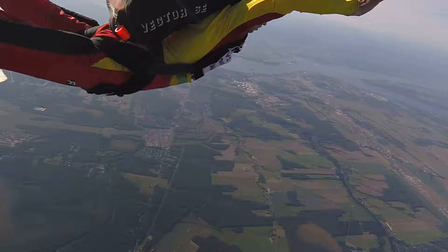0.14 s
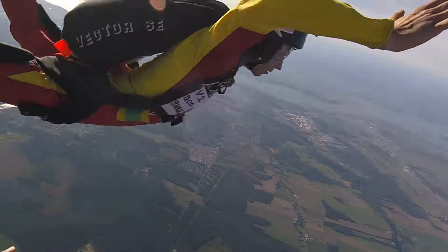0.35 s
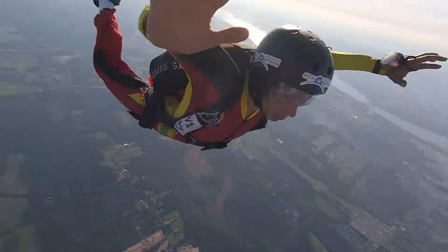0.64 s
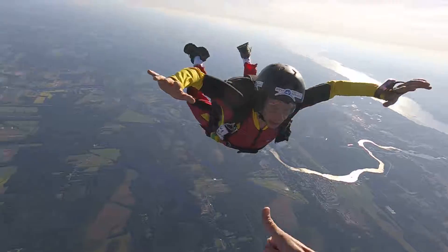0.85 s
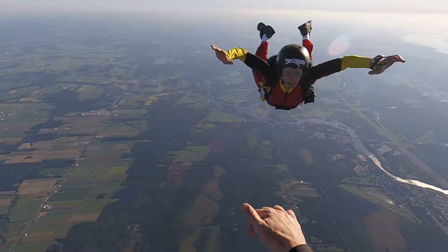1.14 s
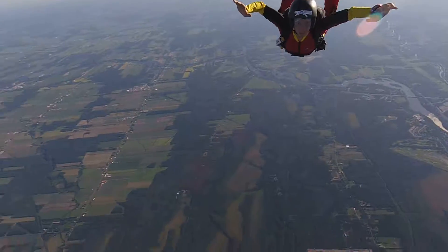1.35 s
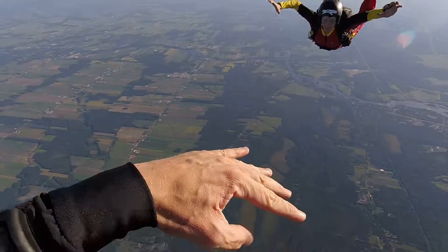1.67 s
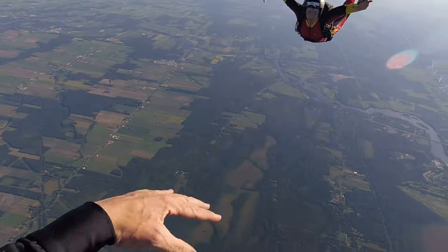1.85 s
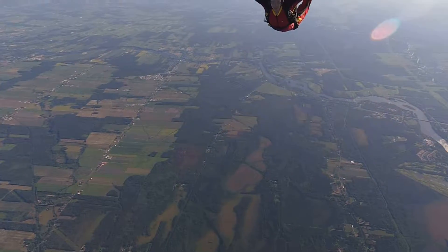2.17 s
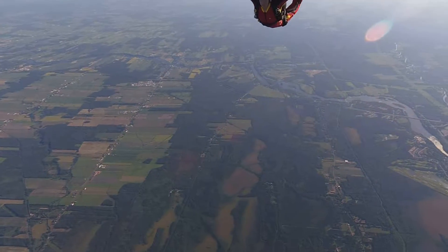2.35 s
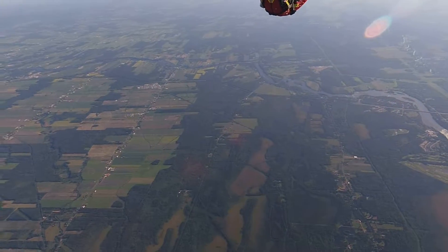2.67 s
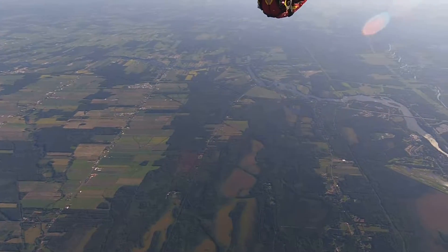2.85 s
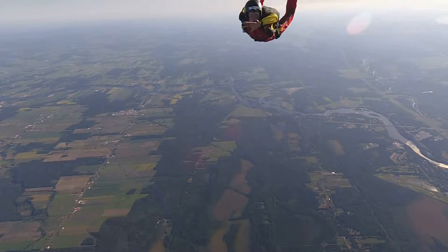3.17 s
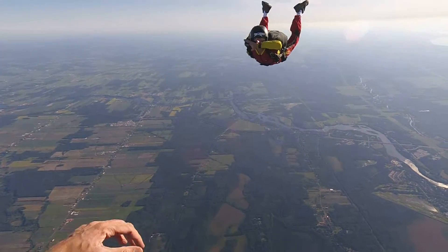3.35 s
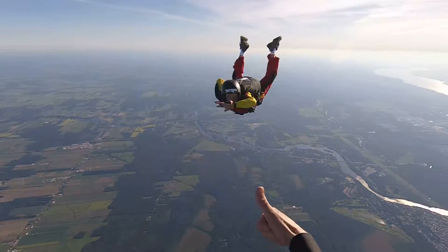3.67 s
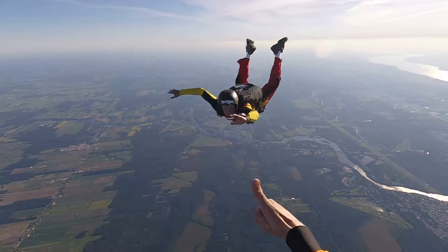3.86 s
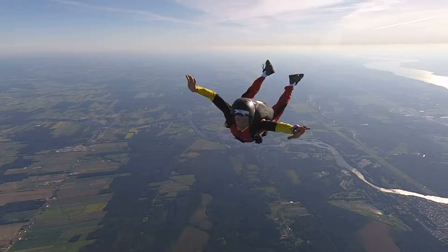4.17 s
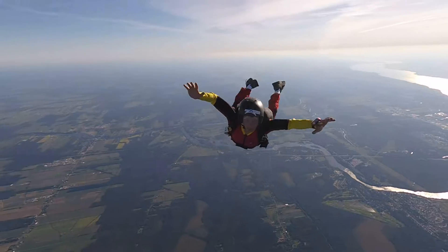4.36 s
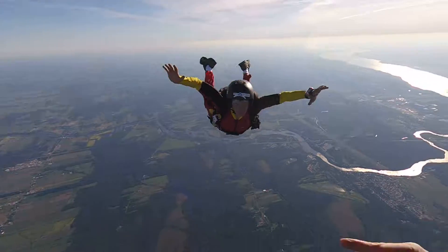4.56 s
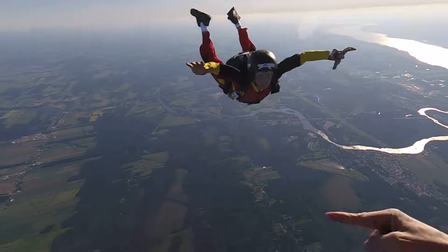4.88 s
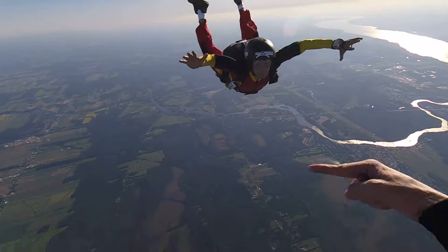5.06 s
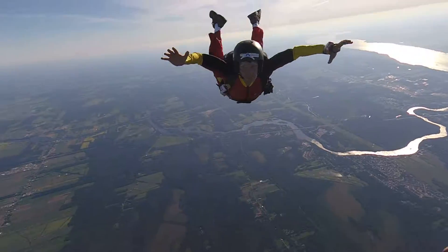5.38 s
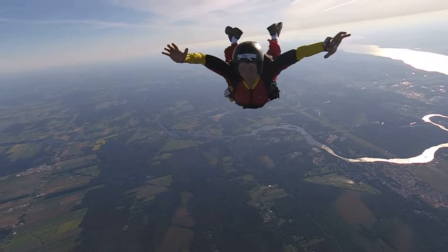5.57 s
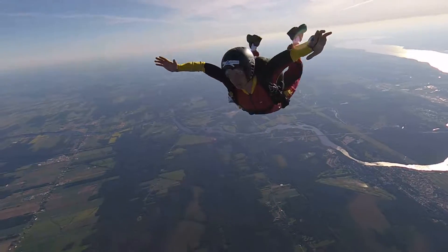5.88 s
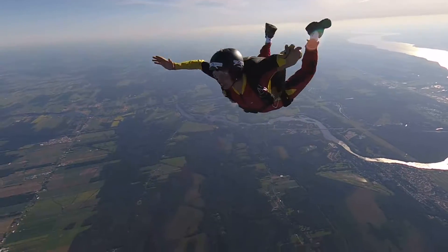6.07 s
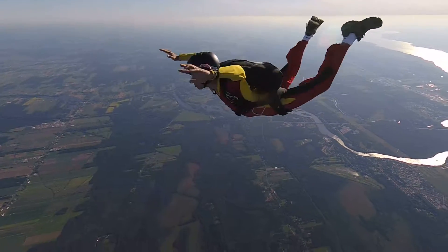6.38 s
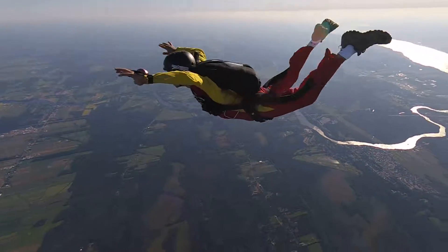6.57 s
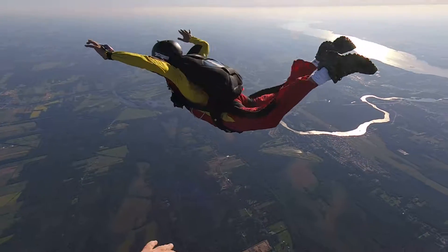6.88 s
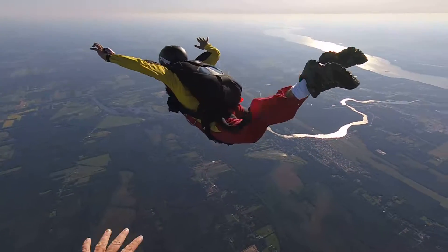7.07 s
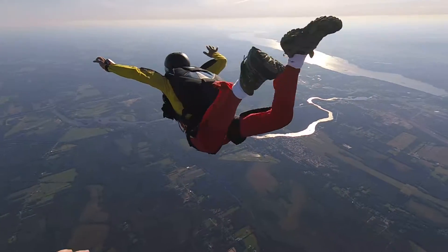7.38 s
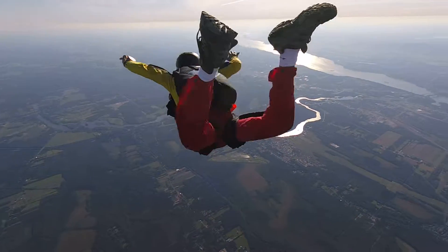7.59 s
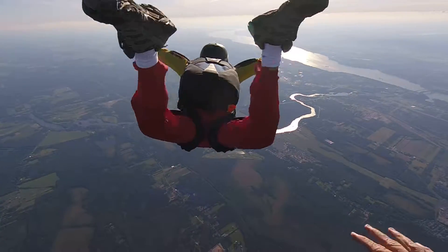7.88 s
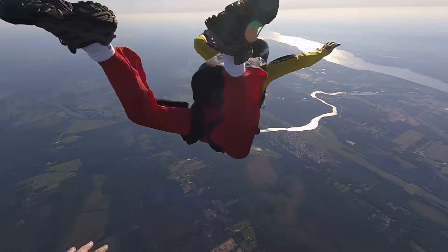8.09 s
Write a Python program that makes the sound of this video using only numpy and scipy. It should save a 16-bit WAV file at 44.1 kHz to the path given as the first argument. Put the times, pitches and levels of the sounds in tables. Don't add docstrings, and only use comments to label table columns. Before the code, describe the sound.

Relentless wind noise in open air, captured in mono by a tiny camera on a falling person's helmet. Low throbbing pressure dominates from start to end, its peaks blunted. Over it come irregular flaps, rough bursts and dry ticks, strongest shortly after two seconds and busy again near five and six, with smoother, duller lulls around three and seven. A thin airy hiss rises and falls above.

```python
import sys
import numpy as np
from scipy import signal
from scipy.fft import rfft, irfft, next_fast_len
from scipy.io import wavfile
from scipy.ndimage import uniform_filter1d, map_coordinates

SR = 44100
rng = np.random.default_rng(int(sys.argv[2]) if len(sys.argv) > 2 else 0)


def put_to_file(sound):
    columns = np.atleast_2d(sound).T
    safe = np.clip(columns, -1, 1)
    whole_steps = np.round(safe * 32767)
    wavfile.write(sys.argv[1], SR, whole_steps.astype(np.int16))


def level_to_linear(level):
    exponent = np.asarray(level, float) / 20
    return 10 ** exponent


N = 362943

# t/s, throb level/dB, heave over throb/dB
VORTICES = [(0, -11, -8), (.85, -13.5, -3), (1.35, -10.5, -10.5), (1.6, -16, -7), (2.05, -10.5, -10),
            (2.65, -11.5, -8.5), (3.4, -13, -4), (3.74, -12, -11), (4.0, -13, -1.5), (4.45, -15, -5.5),
            (4.86, -9.5, -7), (5.25, -16, 3), (5.5, -16, -5), (5.7, -15, 0), (6.33, -10, -13),
            (7.06, -12.5, -8), (7.4, -16, 0), (8.23, -15, -2)]
# f/Hz, density/dB per Hz
RUMBLE = [(40, -13.5), (55, -0.5), (75, 0.5), (115, -2), (140, -5), (190, -20.5), (250, -25)]
# f/Hz, density/dB per Hz
HEAVE = [(6, -15), (14, -6), (25, -9), (45, -1), (60, -9), (80, -37)]
SHEDDING_HZ, HZ_PER_WAKE_DB, HZ_PER_HEAVE_DB = 89.93, 1.34, -0.9


def vortices():
    throb_db, heave_db = curves(VORTICES)
    wake_db = sum(turbulence()) + gusts(ROLLS)
    rate_hz = SHEDDING_HZ + HZ_PER_WAKE_DB * (wake_db - wake_db.mean())
    rate_hz = rate_hz + HZ_PER_HEAVE_DB * (heave_db - heave_db.mean())
    pumping = rush(RUMBLE, patchy_db=0.5) + level_to_linear(-4.5) * shedding(rate_hz, spread_hz=52)
    throb = steadied(pumping, share=0.25)
    heave = level_to_linear(heave_db) * steadied(rush(HEAVE, patchy_db=0.0), share=0.34)
    return level_to_linear(throb_db + 0.18) * (throb + heave)


def shedding(hz, spread_hz):
    turn = 2 * np.pi * np.cumsum(hz) / SR
    return unit(wobble(spread_hz) * np.cos(turn) + wobble(spread_hz) * np.sin(turn))


def steadied(x, share):
    swell = np.sqrt(np.abs(uniform_filter1d(x ** 2, size=1100)) + 0.01)
    return unit(x / swell ** share)


def wind():
    calm_db, size_db = turbulence()
    gust_db = gusts(GUSTS)
    ragged = ragged_gate(size_db)
    low, high = burst_power()
    eddy_db = calm_db + gust_db - 1.5
    churn = level_to_linear(eddy_db + 2.0 + 0.87 * ragged) ** 2
    return (wake(calm_db + size_db, gust_db, ragged, low)
            + eddies(eddy_db, churn, low)
            + port_hiss(gust_db, ragged, churn, high))


def ragged_gate(size_db):
    flutter = np.maximum(wobble(190), 0) ** 2
    lumps = 0.57 * wobble(7.4) + 1.03 * wobble(45) + 3.27 * wobble(100) + 5.7 * flutter
    ragged = 11 * np.tanh(lumps / 11)
    smoothing_per_db = 0.03
    return ragged * np.clip(1 - smoothing_per_db * (size_db - size_db.mean()), 0.3, 1.4)


# f/Hz, density/dB per Hz
WAKE = [(110, -16.5), (160, 4), (220, 1), (330, -7), (500, -16), (1000, -31.5)]


def wake(flow_db, gust_db, ragged, low):
    gust_share = 0.36
    wake_db = flow_db + gust_share * gust_db + gusts(ROLLS) - 4.5 + 0.77 * wobble(11)
    power = level_to_linear(wake_db + 0.5 + 0.65 * ragged) ** 2 + level_to_linear(7.0) * low
    return np.sqrt(power) * rush(WAKE, patchy_db=-1.06)


# f/Hz, density/dB per Hz
EDDY = [(150, -29.5), (300, 1), (600, -5.5), (1200, -13), (2400, -24.5), (3600, -32.5), (4600, -40),
        (5600, -62)]


def eddies(eddy_db, churn, low):
    power = churn + level_to_linear(eddy_db - 12.5) ** 2 + low
    return np.sqrt(power) * rush(EDDY, patchy_db=-0.2)


# t/s, peak level/dB, sizzle/dB, length/ms
BURSTS = [(0.455, -10.5, -29, 3.5), (0.624, -15, -24, 6.4), (1.033, -11.5, -25, 5.5),
          (1.37, -13, -24.5, 5.8), (1.413, -12, -22, 7.2), (2.078, -13, -29.5, 4.2), (2.106, -9.5, -21, 12),
          (2.208, -7.5, -18.5, 5.4), (2.406, -11, -29.5, 5.7), (2.602, -9, -20, 4.2),
          (3.645, -12.5, -28.5, 7), (4.028, -16, -28, 6), (4.191, -10.5, -18, 6.6), (4.329, -17, -29, 5.1),
          (4.668, -6.5, -22.5, 6), (4.788, -10.5, -34, 3.4), (4.841, -12.5, -31, 8.6), (4.914, -15, -22, 3),
          (5.062, -17.5, -29.5, 5.5), (5.49, -23, -31, 4.7), (5.556, -16, -34, 4.6),
          (5.696, -19, -17.5, 6.8), (5.768, -13, -27.5, 6.2), (5.812, -5.5, -24.5, 5.9),
          (5.863, -7, -28, 6.7), (5.978, -6.5, -32, 5.4), (6.282, -10.5, -21.5, 7),
          (6.402, -12.5, -16.5, 3.6), (7.391, -22, -23, 5), (7.465, -16, -17.5, 7.5)]
# t/s, peak level/dB, sizzle/dB
FLAPS = [(0.713, -17.5, -26), (0.885, -24, -34), (1.436, -13, -26), (1.509, -12.5, -39), (2.023, -17, -22),
         (2.171, -13.5, -19), (2.273, -14, -30), (2.525, -14, -29), (2.64, -15, -24), (3.017, -20, -26),
         (3.343, -16, -26.5), (3.434, -19, -24), (3.721, -19.5, -24), (4.355, -14, -29),
         (4.552, -14.5, -19), (4.58, -16, -23), (4.712, -14, -23), (4.744, -11, -23), (4.929, -12.5, -22),
         (5.315, -16.5, -25), (5.442, -18.5, -22.5), (5.894, -12.5, -34), (6.311, -16, -23),
         (6.537, -18, -20), (6.619, -13.5, -25.5), (7.043, -24, -19.5), (7.21, -18.5, -23),
         (7.532, -18, -27), (7.606, -14.5, -26.5), (8.064, -12, -29)]


def bursts():
    s, around_db, size, colour, span = scattered(per_s=22)
    peak_db = around_db + 10.5 + 4.5 * size
    sizzle_db = -29 + 3.5 * colour
    ms = 4.9 * np.exp(0.3 * span)
    flap_ms = np.full(len(FLAPS), 6)
    middling = [*np.transpose(FLAPS), flap_ms]
    return np.hstack([np.transpose(BURSTS), middling, [s, peak_db, sizzle_db, ms]])


def burst_power():
    s, peak_db, sizzle_db, ms = bursts()
    torn = level_to_linear(3.1 * wobble(330))
    low = torn * humps(s, peak_db - 7.5, 1.52 * ms, lead=0.14)
    high = torn * humps(s, peak_db + sizzle_db - 8, 1.3 * ms, lead=0.15)
    return low, high


# t/s, peak level/dB
TICKS = [(0.626, -36), (0.7123, -31), (1.4022, -28), (1.417, -24), (2.0253, -30.5), (2.0794, -35),
         (2.1046, -31), (2.141, -25), (2.1794, -20), (2.248, -23), (2.2763, -20.5), (2.423, -25),
         (2.602, -26.5), (3.4353, -42), (4.1936, -42), (4.558, -24), (4.6336, -23), (4.6668, -26.5),
         (4.7396, -18), (4.8512, -25), (5.3108, -26.5), (5.8092, -34), (5.8646, -34), (5.9788, -26),
         (6.284, -47), (6.32, -29), (6.3707, -29), (6.4113, -25.5), (7.4706, -31), (7.652, -30)]
# f/Hz, density/dB per Hz
SNAP = [(500, -10.5), (1500, 11.5), (3000, 2.5), (4500, -9), (5800, 2.5), (9000, -13.5), (12000, -25.5),
        (15600, -41.5)]


def snaps():
    s, around_db, size = scattered(per_s=8)[:3]
    faint_db = around_db - 5 + 2 * size
    s, peak_db = np.hstack([np.transpose(TICKS), [s, faint_db]])
    power = humps(s, peak_db - 3.0, np.full(len(s), 4.6), lead=0.16)
    return np.sqrt(power) * rush(SNAP, patchy_db=-4.5)


# t/s, speed as hiss level/dB, angle as edge over hiss/dB
CROSSWIND = [(0.0, -55.5, -1), (0.27, -58.5, -3), (1.28, -57.5, 1), (1.99, -56, -8), (2.08, -52, -5),
             (2.25, -51, -14), (2.7, -58, -10), (3.09, -62.5, -1.5), (4.1, -57.5, 5), (4.42, -51, -0.5),
             (4.72, -52, 0.5), (5.16, -59, 0), (5.75, -55.5, 3), (6.42, -55, -0.5), (6.46, -56, -8),
             (6.81, -63, -5.5), (6.97, -66, 2), (8.23, -54.5, 2.5)]
# f/Hz, density/dB per Hz
PORT = [(3600, -24), (4600, -11.5), (5200, -2.5), (5800, 1.5), (6600, -3), (7500, -10), (9000, -21),
        (11000, -19), (13000, -48)]
# f/Hz, density/dB per Hz
EDGE = [(5500, -27.5), (6800, -4.5), (7800, -2), (9000, -5), (10500, -11), (12000, -19.5), (14000, -27),
        (15600, -52.5)]


def port_hiss(gust_db, ragged, churn, high):
    hiss_db, edge_db = curves(CROSSWIND)
    port = rush(PORT, patchy_db=1.6) + level_to_linear(edge_db - 2.5) * rush(EDGE, patchy_db=1.5)
    gust_share = 0.18
    steady = level_to_linear(hiss_db + gust_share * gust_db + 0.26 + 0.28 * ragged)
    return np.sqrt(steady ** 2 + level_to_linear(-28.5) ** 2 * churn + high) * port


# t/s, turbulence level/dB, eddy size as wake over turbulence/dB
FLOW = [(0.0, -37.5, 10.5), (1.44, -37, 15), (1.56, -38.5, 10.5), (1.7, -34.5, 20.5), (1.99, -35.5, 14),
        (2.27, -27.5, 11), (3.12, -42.5, 18), (3.58, -38.5, 8.5), (3.76, -39.5, 17), (3.8, -40.5, 9),
        (4.15, -38, 17), (4.79, -32.5, 10), (5.29, -40, 13.5), (5.73, -35, 12.5), (6.42, -35.5, 17.5),
        (6.85, -44, 12), (8.18, -37, 13.5), (8.23, -39, 10.5)]


def turbulence():
    return curves(FLOW)


# middle t/s, length/s, swell/dB
GUSTS = [(0.022, 0.12, 6.5), (.45, 0.14, 0), (.632, 0.026, 8), (1.72, 0.23, 1.5), (.8, 0.23, 4.5),
         (1.06, 0.092, 9), (1.456, 0.2, 10), (2.107, 0.36, 2), (2.24, 0.22, 3), (2.428, 0.098, 3),
         (2.597, 0.15, 0.5), (3.33, 0.082, 1.5), (3.463, 0.14, 3.5), (3.657, 0.11, -0.5), (4.209, 0.28, 4),
         (4.365, 0.13, 6), (4.57, 0.09, -1), (4.72, 0.092, 8), (4.865, 0.032, 8.5), (4.951, 0.17, 9.5),
         (5.317, 0.19, 8), (5.604, 0.055, 0.5), (5.839, 0.29, 6), (6.3, 0.35, 6), (6.417, .12, 6),
         (6.6, 0.25, 5), (7.067, 0.069, 5.5), (7.46, 0.13, 2), (8.057, 0.089, 7.5), (8.161, 0.11, 6)]
# middle t/s, length/s, swell/dB
ROLLS = [(.43, 0.18, 5), (.75, 0.2205, 8), (1.3, 0.251, 5), (1.84, 0.399, 7), (2.1, .15, 5),
         (2.45, 0.17, 8.5), (2.62, .12, 6), (2.79, .24, 8), (3.5, 0.18, 3.5), (4.2, 0.26, 4.5),
         (4.6, 0.26, 0.5), (5.32, .15, 7.5), (5.6, 0.11, 2), (5.8, 0.15, 5), (6.2, 0.15, 6), (6.62, .12, 3),
         (7.32, .1, 5), (7.6, 0.21, 1.5), (8.12, 0.28, 1)]


def gusts(rows):
    swell = np.zeros(N + 2 * SR)
    for s, length, db in rows:
        shape = np.hanning(round(length * SR)) ** 0.706
        start = SR + round((s - length / 2) * SR)
        swell[start:][:len(shape)] += db * shape
    return swell[SR:][:N]


def scattered(per_s):
    draws = rng.standard_normal((int(per_s * N / SR), 4))
    s = (np.arange(len(draws)) + 0.5 + draws[:, 0] / 2) / per_s
    s = np.clip(s, 0, (N - 1) / SR)
    around_db = turbulence()[0] + gusts(GUSTS)
    return s, around_db[(s * SR).astype(int)], *draws[:, 1:].T


def humps(times, db, ms, lead):
    power = np.zeros(N + SR)
    for s, level_db, length in zip(times, db, np.clip(ms, 1, 40) * SR / 1000):
        shape = np.hanning(round(length))
        start = max(round(s * SR - lead * length), 0)
        power[start:][:len(shape)] += level_to_linear(level_db) ** 2 * shape
    return power[:N]


def rush(spectrum, patchy_db):
    z = signal.stft(rng.standard_normal(N + 512), nperseg=512)[2]
    field = uniform_filter1d(rng.standard_normal(z.shape), size=8, axis=0)
    field = uniform_filter1d(field, size=6, axis=1)
    noise = signal.istft(z * level_to_linear(patchy_db * unit(field)), nperseg=512)[1]
    m = next_fast_len(len(noise))
    hz, db = np.transpose(spectrum)
    log_f = np.log(np.fft.rfftfreq(m, 1 / SR) + 1)
    gain = level_to_linear(np.interp(log_f, np.log(hz), db, -120, -120))
    return unit(irfft(rfft(noise, m) * gain, m)[:N])


def wobble(rate):
    knots = rng.standard_normal(int(N / SR * 400))
    return unit(map_coordinates(knots, [np.arange(N) * rate / SR]))


def curves(rows):
    s, *cols = np.transpose(rows)
    return [np.interp(np.arange(N) / SR, s, c) for c in cols]


def unit(x):
    return x / np.sqrt(np.mean(x ** 2) + 1e-20)


def scene():
    return (vortices() + wind() + snaps())[None]


def top_cut(x):
    return signal.sosfilt(signal.butter(12, 15700, fs=SR, output="sos"), x)


def record(dry):
    soft = dry / (1 + np.abs(dry / 0.97) ** 7) ** (1 / 7)
    return top_cut(soft)


dry = scene()
out = record(dry)
put_to_file(out)
```